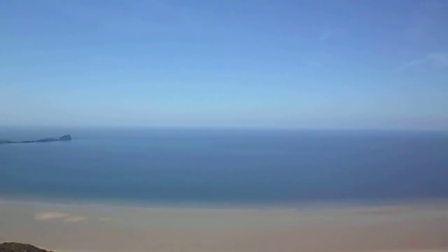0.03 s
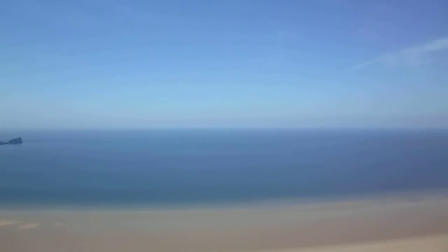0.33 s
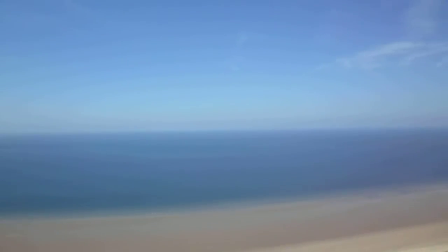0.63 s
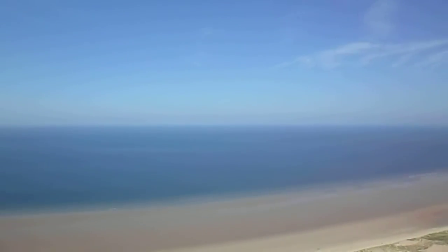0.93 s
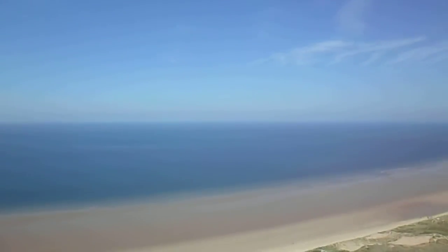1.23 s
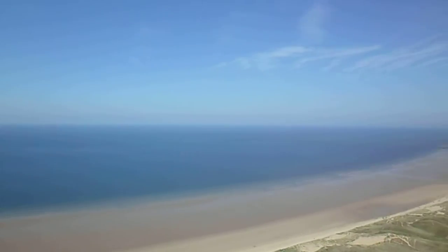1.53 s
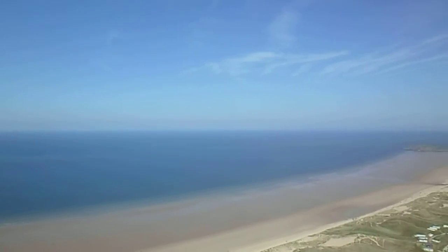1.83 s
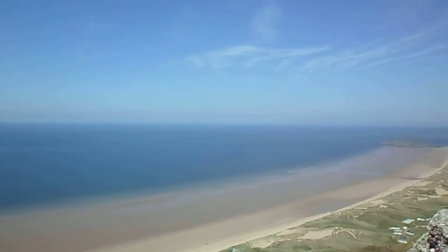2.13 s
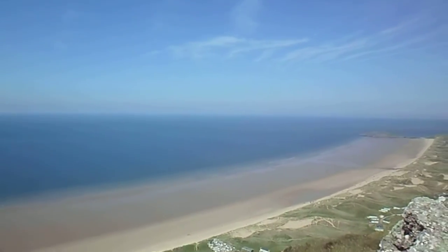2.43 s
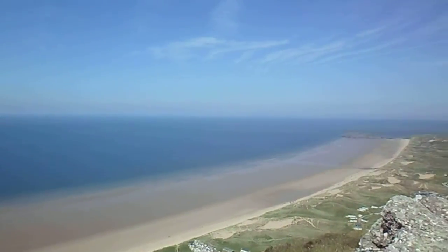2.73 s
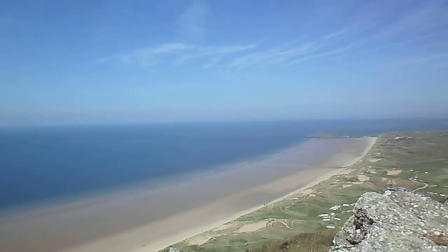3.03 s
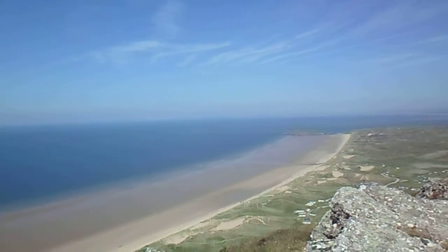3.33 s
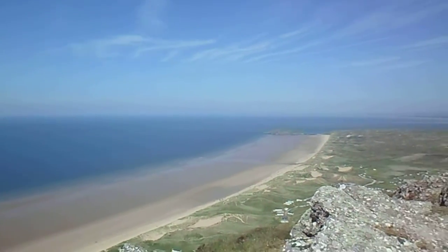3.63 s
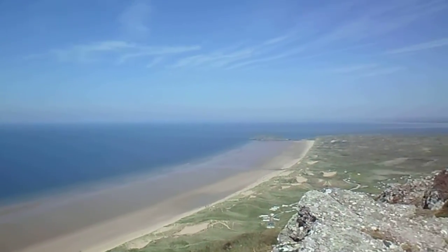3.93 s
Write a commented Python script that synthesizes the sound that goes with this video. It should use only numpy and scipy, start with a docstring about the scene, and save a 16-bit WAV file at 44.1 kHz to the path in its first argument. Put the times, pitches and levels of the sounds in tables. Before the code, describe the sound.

Gusty wind blows straight onto a microphone high on an open coastal hill, making a continuous, uneven rumble. Rapid surges add a brighter rasp and occasional crackling thumps, growing a little sharper in the second half.

```python
"""Turbulent wind buffets a small camera microphone on an exposed hilltop.
The frequency of eddies passing the port is proportional to the air speed, so their whole spectrum
slides upward in each buffet and is heard as a bright rasp. Beneath them, large eddies rumble.
The hardest slaps of air overload the input, which crackles; faint dry ticks and hiss lie behind."""
import sys
import numpy as np
from scipy import signal
from scipy.fft import rfft, irfft
from scipy.io import wavfile
from scipy.ndimage import uniform_filter1d

SR = 44100
rng = np.random.default_rng(int(sys.argv[2]) if len(sys.argv) > 2 else 0)


def log_audio(samples):
    """Write samples as a 16-bit WAV file to the path given in sys.argv[1]."""
    # one column per channel
    frames = np.atleast_2d(samples).T
    # limit to full scale, then quantise
    limited = np.clip(frames, -1, 1)
    pcm = np.round(limited * 32767).astype(np.int16)
    wavfile.write(sys.argv[1], SR, pcm)


N = 176400

# self-noise of the microphone (frequency [Hz], spectral density [dB per Hz])
HISS_SPECTRUM = [(100, -104), (1000, -110), (2000, -118), (3500, -122.5), (6000, -125), (10000, -127)]
# noise of the input at full overload (frequency [Hz], spectral density [dB per Hz])
CRACKLE_SPECTRUM = [(100, -80), (2000, -84), (4000, -93), (7000, -98.5), (10000, -100)]
# slaps of air (time [s], peak pressure before saturation [fraction of full scale])
SLAPS = [(0.355, 0.18), (.394, 0.24), (.438, 0.3), (0.567, 0.3), (0.634, 0.12), (.761, 0.25), (0.924, 0.27),
         (1.195, 0.23), (1.628, 0.34), (1.741, 0.2), (1.831, 0.25), (1.995, 0.38), (2.236, 0.31),
         (2.553, 0.27), (2.577, 0.27), (2.598, 0.09), (2.659, 0.38), (2.672, .26), (2.967, 0.25),
         (3.587, 0.23), (3.62, 0.29), (3.652, 0.47)]
# spectrum of the large eddies (frequency [Hz], relative level [dB])
RUMBLE_SPECTRUM = [(1, -47), (8, -1.5), (14, 4.5), (25, -2.5), (40, -4.5), (60, -5.5), (85, -5.5),
                   (125, -13.5), (200, -16.5), (400, -51.5), (1000, -90.5)]
# envelope of the large eddies (time [s], relative level [dB])
RUMBLE_ENVELOPE = [(0, -22), (.33, -25.5), (.55, -25.5), (.7, -29), (.93, -24), (1.15, -30.5),
                   (1.45, -26.5), (1.65, -22), (1.8, -29.5), (2.08, -29.5), (2.22, -28), (2.33, -25.5),
                   (2.42, -32.5), (2.52, -38), (2.61, -22.5), (2.77, -25.5), (2.88, -26.5), (3.3, -27.5),
                   (3.47, -25), (3.59, -21.5), (3.75, -26.5), (4, -25.5)]
# underlying flow between buffets (time [s], speed [1 = moderate wind])
BREEZE = [(0, 1.24), (.2, 0.56), (.3, 1.074), (.52, 1), (.69, 0.58), (.85, 0.68), (1.12, 0.62),
          (1.58, 0.67), (1.71, 0.7), (2.08, 0.67), (2.28, 0.99), (2.35, 0.65), (2.535, 0.6), (2.6, 2.1),
          (2.73, 1.43), (2.8, 0.56), (3.11, 1.45), (3.24, 0.65), (3.47, 0.37), (3.54, 0.95), (4, 0.76)]
# brief surges of air (peak time [s], width at half height [s], added speed [1 = moderate wind])
BUFFETS = [(0.011, 0.0046, 0.56), (0.06, 0.011, 0.77), (0.084, 0.026, 0.55), (0.16, 0.013, 1.18),
           (0.227, 0.0083, 1.57), (0.246, 0.007, 0.82), (0.266, 0.0092, 0.35), (0.298, 0.015, 0.73),
           (0.35, 0.0064, 1.97), (0.427, 0.0083, 0.8), (0.458, 0.0029, 0.36), (0.504, 0.0081, 0.64),
           (0.556, 0.01, 0.64), (0.621, 0.0051, 0.4), (0.635, 0.0069, 0.99), (0.728, 0.007, 0.43),
           (0.761, 0.0048, 0.4), (0.818, 0.0067, 0.35), (0.853, 0.0067, 1.3), (0.908, 0.0067, 0.48),
           (0.927, 0.0044, 0.51), (1.055, 0.015, 0.82), (1.082, 0.004, 0.59), (1.195, 0.0095, 1.51),
           (1.259, 0.0088, 0.47), (1.299, 0.0046, 0.21), (1.415, 0.0088, 0.59), (1.601, 0.03, 1.03),
           (1.628, 0.0061, 1.34), (1.666, 0.0061, 0.57), (1.745, 0.016, 1.26), (1.784, 0.01, 0.64),
           (1.833, 0.024, 0.56), (1.882, 0.017, 0.89), (1.946, 0.014, 1.26), (1.997, 0.012, 0.97),
           (2.051, 0.014, 1.06), (2.115, 0.032, 0.95), (2.171, 0.0095, 0.73), (2.19, 0.009, 0.89),
           (2.209, 0.0054, 1.4), (2.235, 0.009, 1.1), (2.303, 0.019, 0.49), (2.418, 0.012, 0.68),
           (2.559, 0.0052, 1.46), (2.596, 0.012, 0.79), (2.64, 0.012, 0.8), (2.692, 0.0033, 0.53),
           (2.757, 0.025, 1.33), (2.804, 0.0095, 0.78), (2.823, 0.011, 1.03), (2.85, 0.0061, 0.67),
           (2.874, 0.0053, 0.73), (2.887, 0.0052, 0.84), (2.916, 0.013, 1.1), (2.951, 0.012, 0.73),
           (2.967, 0.0033, 0.55), (3.008, 0.012, 0.66), (3.063, 0.025, 0.85), (3.095, 0.0068, 0.52),
           (3.151, 0.013, 0.5), (3.179, 0.021, 0.66), (3.225, 0.01, 0.36), (3.269, 0.014, 0.79),
           (3.292, 0.014, 0.86), (3.356, 0.017, 0.48), (3.39, 0.0078, 0.75), (3.529, 0.012, 0.39),
           (3.563, 0.0059, 0.66), (3.622, 0.0073, 0.67), (3.669, 0.014, 1.27), (3.755, 0.025, 0.53),
           (3.808, 0.0057, 0.29), (3.859, 0.019, 0.56), (3.938, 0.025, 0.95), (3.996, 0.01, 1.11)]
# turbulence at speed 1 and frequency factor 1 (frequency [Hz], relative level [dB])
EDDY_SPECTRUM = [(30, -62), (120, -54.5), (220, -56.5), (380, -60.5), (500, -63), (750, -70), (1000, -78),
                 (1500, -88.5), (2000, -101), (3000, -118), (4500, -140), (8000, -170)]
# response of the port, which dulls the treble (frequency [Hz], gain [dB])
PORT_RESPONSE = [(300, 1), (800, 0), (1500, 0.5), (3000, -2), (4200, -6.5), (6000, -6.5), (10000, -7.5)]
# effect of the flow's angle on the eddies as the camera turns (time [s], gain [dB], frequency factor [1])
INCIDENCE = [(0, -1, 0.7), (0.398, 2.5, 0.75), (1.199, 3, 0.86), (1.65, 2, 0.81), (2.301, 1, 0.77),
             (2.459, -6.5, 0.78), (2.559, 1, 0.82), (2.65, -2.5, 1.02), (2.76, -8, 1.85), (2.849, 0, 1.28),
             (3.15, -5.5, 1.27), (3.44, -0.5, 1.31), (3.572, 5, 0.66), (3.679, -7.5, 1.51),
             (3.821, -3.5, 1.17), (4, -4.5, 1.73)]

CEILING, EDGE_HZ, FADE_S = .24, 10800, .003  # overload limit (full scale = 1), band edge, end fades


def gain_of(db):
    """Amplitude grows tenfold for every 20 dB."""
    return 10 ** (np.asarray(db) / 20)


def level_at(spectrum, hz):
    """Interpolation of a spectrum on a logarithmic frequency axis."""
    frequencies, levels = np.transpose(spectrum)
    return np.interp(np.log(hz + 1e-3), np.log(frequencies), levels)


def curve(points):
    """Linear interpolation of (time, value) points at every sample."""
    return np.interp(np.arange(N) / SR, *np.transpose(points))


def noise(spectrum):
    """Spectral shaping: filtered white noise takes on the given density in dB per Hz."""
    hz = np.fft.rfftfreq(N, 1 / SR)
    return irfft(rfft(rng.standard_normal(N)) * gain_of(level_at(spectrum, hz)), N) * np.sqrt(SR / 2)


def hiss():
    """Self-noise: the microphone adds a faint stationary floor."""
    return noise(HISS_SPECTRUM)


def ticks(per_s=13, level_db=-54.5, spread_db=5):
    """A Poisson process: faint dry impulses occur independently, with log-normal amplitudes."""
    occurs = rng.random(N) < per_s / SR
    return occurs * gain_of(level_db + spread_db * rng.standard_normal(N))


def overload(pressure, onset_power=13):
    """Saturation: the input stops at its ceiling, and crackle sets in by a steep power law near it."""
    crackle_gain = np.minimum(abs(pressure) / CEILING, 1) ** onset_power
    return np.clip(pressure, -CEILING, CEILING) + crackle_gain * noise(CRACKLE_SPECTRUM)


def slaps(wind, time_constant_s=0.00067):
    """Pressure transients: each pulse carries the wind to a set peak, in the direction it already pushes."""
    t, pulses = np.arange(N) / SR, np.zeros(N)
    for at, peak in SLAPS:
        near = slice(*np.searchsorted(t, [at - 10 * time_constant_s, at + 10 * time_constant_s]))
        pressure = wind[round(at * SR)]
        pulses[near] += (np.sign(pressure) * peak - pressure) / np.cosh((t[near] - at) / time_constant_s)
    return pulses


def rumble(gain_db=1.5, window_samples=7000):
    """Large-scale turbulence: big eddies push the diaphragm slowly, swelling and sagging with the gusts."""
    pressure = noise(RUMBLE_SPECTRUM)
    local_power = uniform_filter1d(uniform_filter1d(pressure ** 2, window_samples), window_samples)
    steady = pressure / np.sqrt(local_power + 1e-20)
    return steady * gain_of(curve(RUMBLE_ENVELOPE) + gain_db)


def air_speed(flutter_depth=0.31, low_hz=19, top_hz=153, rise_share=0.43):
    """Unsteady flow: a breeze flutters at random, and buffets add to it, rising faster than they fall."""
    t, hz = np.arange(N) / SR, np.fft.rfftfreq(N, 1 / SR)
    flutter_band = hz / (hz + low_hz) * np.exp(-(hz / top_hz) ** 2)
    flutter = irfft(rfft(rng.standard_normal(N)) * flutter_band, N)
    flutter /= np.sqrt(np.mean(flutter ** 2) + 1e-20)
    breeze = curve(BREEZE)
    speed = breeze * np.exp(flutter_depth * flutter / np.maximum(breeze, 1))
    for at, width, surge in BUFFETS:
        near = slice(*np.searchsorted(t, [at - 2 * width, at + 2 * width]))
        flank_s = width * np.where(t[near] < at, rise_share, 1 - rise_share)
        speed[near] += surge * .5 ** (((t[near] - at) / flank_s) ** 2)
    return np.maximum(speed, .1)


def eddies(speed, bands=30, gain_db=-0.5, growth_db=3.12, punch_db=1):
    """Strouhal scaling: eddy frequencies at the port rise in proportion to the air speed."""
    times, incidence_db, frequency_factor = np.transpose(INCIDENCE)
    slide = speed * curve(np.c_[times, frequency_factor])
    centres_hz = np.geomspace(30, 11000, bands)
    band_position = np.interp(np.log(np.fft.rfftfreq(N, 1 / SR) + 1), np.log(centres_hz), np.arange(bands))
    white, pressure = rfft(rng.standard_normal(N)) * np.sqrt(SR / 2), np.zeros(N)
    for k, hz in enumerate(centres_hz):
        band = irfft(white * np.maximum(1 - abs(band_position - k), 0), N)
        pressure += band * gain_of(level_at(EDDY_SPECTRUM, hz / slide) + level_at(PORT_RESPONSE, hz))
    # faster air is louder, and a surge above the breeze hits harder than a steady blow
    force_db = growth_db * np.log2(speed) + punch_db * np.log2(speed / curve(BREEZE))
    return pressure * gain_of(gain_db + curve(np.c_[times, incidence_db]) + force_db)


def scene():
    """Superposition: eddies, rumble, slaps and ticks add at one microphone."""
    wind = eddies(air_speed()) + rumble()
    return (wind + slaps(wind) + ticks())[None]


def record(dry):
    """A nonlinear, band-limited input: overload and hiss, faded at both ends, pass a low-pass filter."""
    electrical = overload(dry) + hiss()
    t = np.arange(N) / SR
    fade = np.sin(np.pi / 2 * np.minimum(np.minimum(t, t[::-1]) / FADE_S, 1)) ** 2
    lowpass = signal.firwin(255, EDGE_HZ, window=("kaiser", 9), fs=SR)
    return signal.oaconvolve(electrical * fade, lowpass[None], "same")


dry = scene()
out = record(dry)
log_audio(out)
```